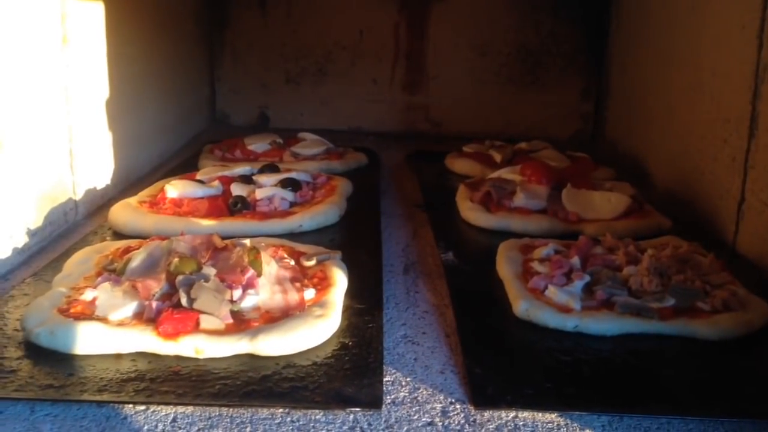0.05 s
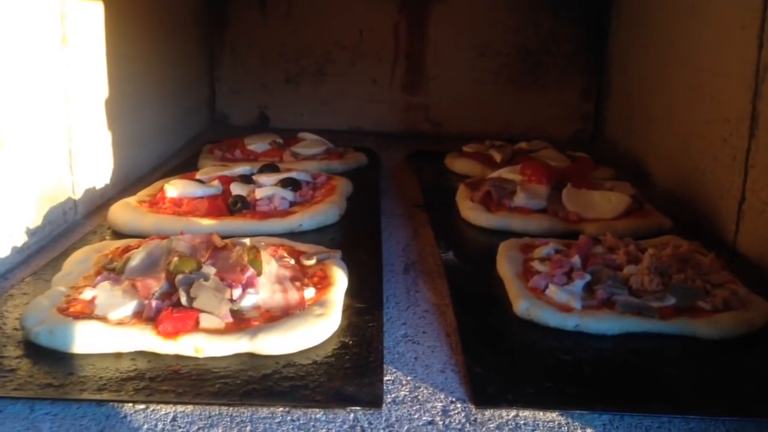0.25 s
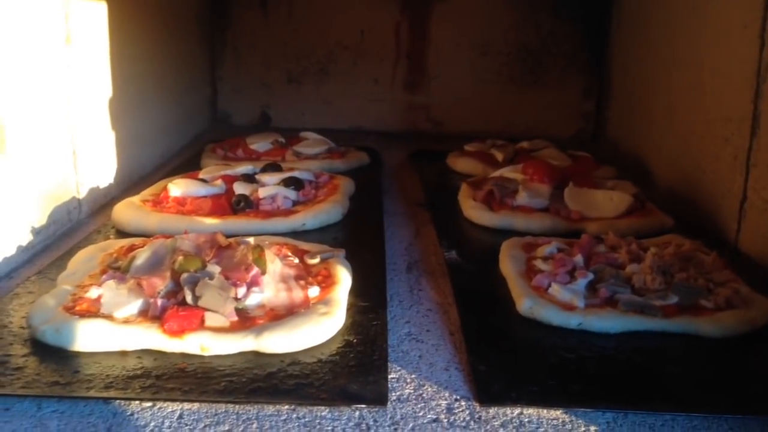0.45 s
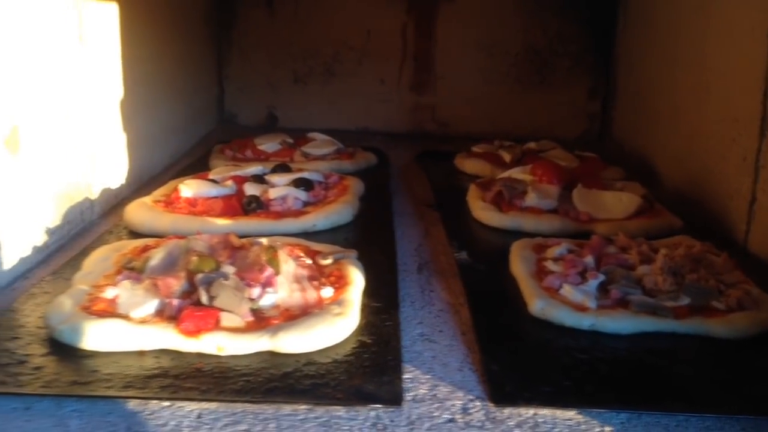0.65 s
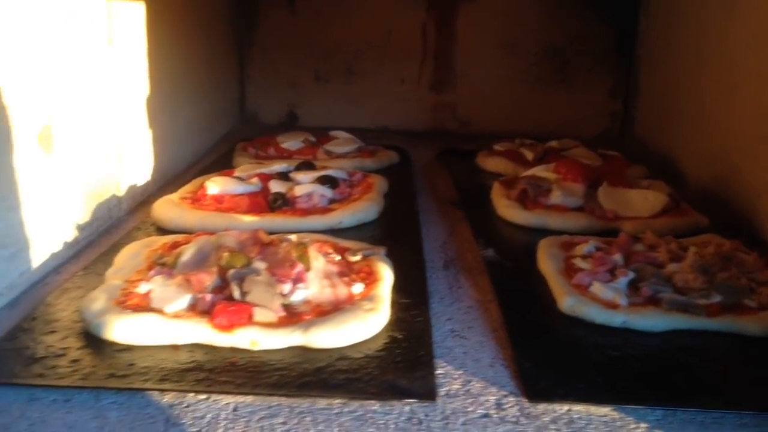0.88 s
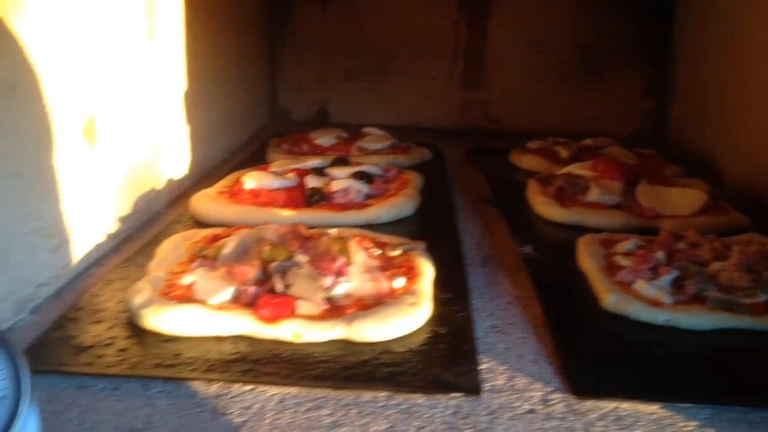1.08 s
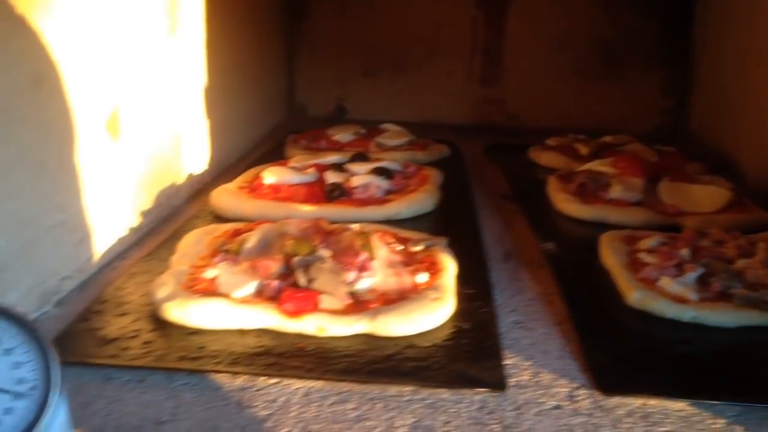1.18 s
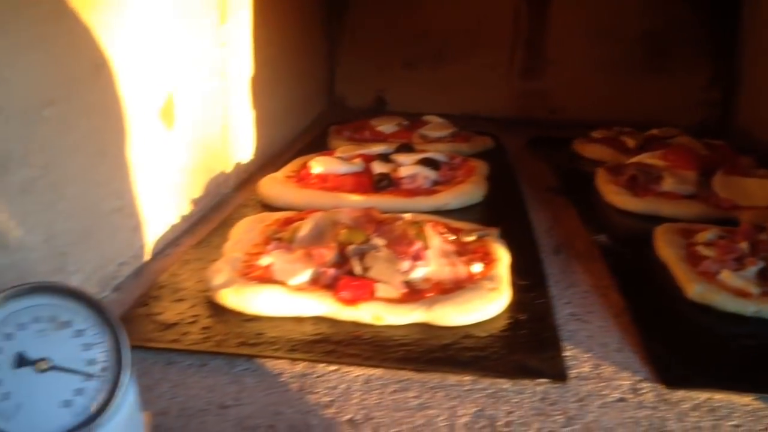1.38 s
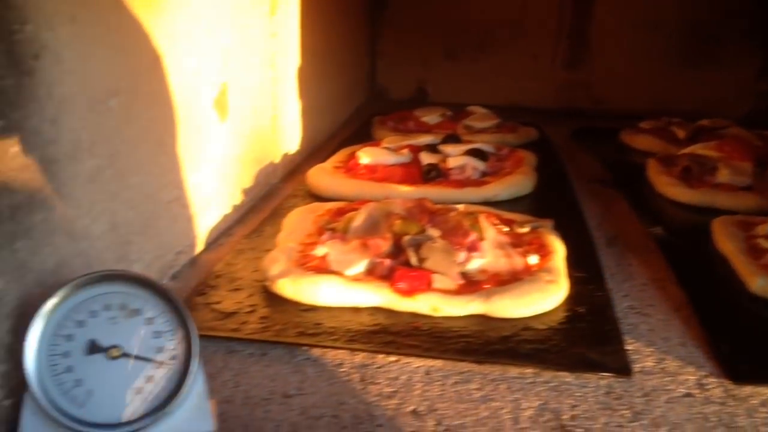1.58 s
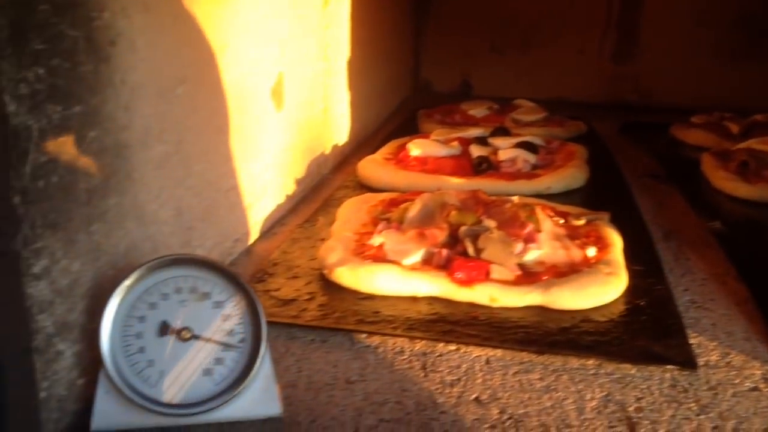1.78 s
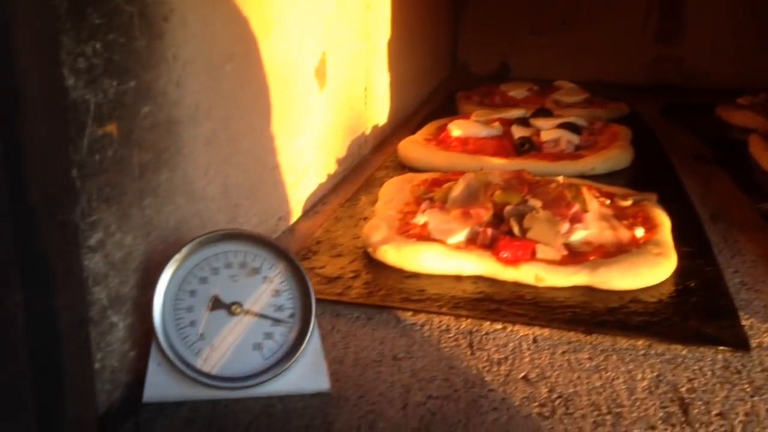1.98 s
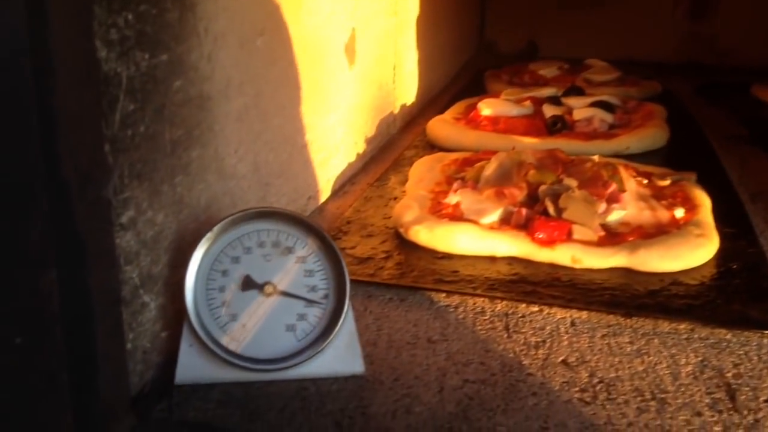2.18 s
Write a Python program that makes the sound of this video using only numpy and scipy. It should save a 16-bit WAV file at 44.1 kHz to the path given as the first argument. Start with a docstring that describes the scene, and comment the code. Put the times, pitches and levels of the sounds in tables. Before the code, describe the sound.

A wood fire crackles quietly in a masonry oven, heard from just outside its mouth. Sharp pops come at about 0.3 and 0.4 seconds, then around 0.9, 1.0 and 1.2, each ringing briefly in the chamber. Small ember ticks scatter throughout over a low, softly surging rumble, a wavering hum and light hiss. A very faint high whistle enters at about 2.2 seconds.

```python
"""Wood fire in an outdoor masonry oven.

Heard from just outside the mouth. Splitting wood pops and small embers tick; the chamber answers
each with a short ring. Faint sparks fall at random. Below lie the draught's rumble and soft surges,
fluttering flames, a wavering hum, even hiss and a thin whine. A faint whistle enters at the end."""
import sys
import numpy as np
from scipy import signal
from scipy.fft import rfft, irfft
from scipy.io import wavfile
from scipy.ndimage import uniform_filter1d

SR = 44100
rng = np.random.default_rng(int(sys.argv[2]) if len(sys.argv) > 2 else 0)


def bounce(signal):
    """Save signal as a 16-bit WAV file at the path given by the first command-line argument."""
    frames = np.transpose(np.atleast_2d(signal))
    limited = np.clip(frames, -1, 1)
    pcm = np.round(limited * 32767).astype(np.int16)
    wavfile.write(sys.argv[1], SR, pcm)


N = 99225

# Wood splits, and at 1.012 s a settling log gives a low knock. Each row: start in seconds, burst decay in
# seconds, resonances of the piece. # Each resonance: centre in Hz, width in Hz, level in dB before CRACKLE_EQ.
POPS = [(0.2765, 0.0017, [(280, 200, -51.5), (900, 1000, -46), (2270, 340, -33.5), (3570, 470, -43),
        (7080, 2400, -37), (10100, 3800, -38.5)]), (0.3903, 0.0012, [(308, 130, -39), (572, 71, -42.5),
        (1090, 500, -32.5), (1560, 820, -31), (2060, 270, -35), (3450, 1120, -37), (4880, 790, -39),
        (9650, 3400, -39)]), (0.877, .0011, [(1010, 900, -61), (2270, 320, -43.5), (3300, 1100, -48.5),
        (5580, 830, -50), (13000, 7700, -58.5)]), (0.9932, 0.0015, [(161, 70, -37), (360, 140, -43),
        (558, 118, -36), (2520, 2000, -48.5), (6360, 1700, -42.5), (10900, 5200, -51.5)]),
        (1.0119, 0.0024, [(137, 68, -40)]), (1.1807, .0012, [(550, 340, -57), (1350, 380, -47),
        (2610, 940, -40.5), (4080, 660, -48.5), (5730, 1800, -44.5)])]
# Ember ticks. Each row: start in seconds, click and ring levels in dB before CRACKLE_EQ, ring in Hz.
EMBER_TICKS = [(.1272, -52.5, -54, 4000), (0.1706, -55.5, -58.5, 2330), (.1782, -61, -70, 8900),
               (0.2922, -58, -58, 8500), (0.366, -62, -68, 8000), (.4670, -51.5, -53, 7200),
               (.5320, -60, -62, 4200), (0.549, -66, -60, 7440), (.5562, -47, -50.5, 11900),
               (.7190, -76, -65, 1800), (0.8232, -61, -62, 4200), (.9300, -62, -71, 7000),
               (1.0900, -58, -60, 6000), (1.1194, -60.5, -58, 11400), (1.2173, -59, -63, 6000),
               (1.3507, -53, -51, 6440), (1.4076, -76, -65, 7550), (1.4850, -51, -59, 3100),
               (1.524, -64, -58.5, 9150), (1.5430, -62, -66, 7500), (1.686, -67, -68, 7000),
               (1.8138, -64, -62, 2980), (1.9850, -57, -51, 6800), (2.1462, -61, -64.5, 7460)]
# Ring of the chamber. Each row: frequency in Hz, gain in dB, T60 in seconds.
OVEN_MODES = [(275, 4, 0.15), (573, -19, 0.098), (820, -2, 0.045), (1056, -4, 0.086), (1260, -4, 0.078),
              (1406, -5, .05), (1430, -12, .04), (1790, -26, 0.07), (2110, -1, 0.044), (3040, -4, .02),
              (3850, -11, .02), (6850, -7, 0.015)]
# Colour of all crackle. Each row: frequency in Hz, gain in dB.
CRACKLE_EQ = [(100, -3), (560, 0.5), (700, -3.5), (850, -1), (2400, -2), (2750, -7), (3200, -3.5),
              (4500, -3.5), (6500, -1), (8500, -2.5), (10200, -1.5), (12500, -1.5), (14000, 0),
              (16000, -11)]
# Draught rumble. Each row: frequency in Hz, relative density in dB.
RUMBLE_SPECTRUM = [(20, -30.5), (30, -21), (42, -9.5), (55, 0), (68, 1.5), (85, -2.5), (102, -3.5),
                   (122, -9.5), (140, -4.5), (170, -15), (215, -10), (300, -17), (350, -19), (450, -22.5),
                   (700, -29), (1100, -34.5), (2500, -45.5), (8000, -70)]
# Draught surges. Each row: peak time in seconds, sigma in seconds, centre in Hz, width in Hz, level in dB.
SURGES = [(.215, 0.041, 70.6, 49.5, -52.5), (0.367, 0.063, 69, 43.3, -48), (0.646, 0.11, 69.4, 48, -51.5),
          (0.85, 0.017, 285, 49.4, -53), (1.464, 0.027, 173, 93, -53.5), (1.523, 0.026, 61.6, 34.5, -47),
          (1.963, 0.026, 142, 50, -50), (1.968, .03, 255, 40.3, -53)]
# Hiss. Each row: frequency in Hz, relative density in dB.
HISS_SPECTRUM = [(500, 1), (2000, -2.5), (3000, -3.5), (3900, -0.5), (5200, -1.5), (6800, -3), (8200, -3),
                 (11000, -3), (15500, -5)]

TICK_DECAY_S, TICK_RISE_S = 0.00071, 0.0001
SCENE_TIME_S, EVENT_TIME_S = np.arange(N) / SR, np.arange(8192) / SR


def pops():
    """Wood splits, and one settling log: a burst of fractures rings the piece; each spot has its own
    reflections."""
    out = np.zeros(N)
    for start_s, decay_s, resonances in POPS:
        chamber = oven_response()
        for hz, width_hz, db in resonances:
            ring = steep_band(burst(decay_s, rise_s=0.00046), hz, width_hz, skirt=2.02)
            add(out, start_s, through_oven(ring, chamber, db))
    return out


def embers():
    """Embers tick: a broad click and a short ring, both answered by the chamber."""
    out = np.zeros(N)
    for start_s, click_db, ring_db, ring_hz in EMBER_TICKS:
        chamber = oven_response()
        click = band(burst(TICK_DECAY_S, TICK_RISE_S), hz=6050, width_hz=12000)
        ring = band(burst(TICK_DECAY_S, TICK_RISE_S), ring_hz, width_hz=0.27 * ring_hz)
        add(out, start_s, through_oven(click, chamber, click_db) + through_oven(ring, chamber, ring_db))
    return out


def sparks(rate_per_s=14, floor_db=-71, spread_db=2):
    """The faintest ticks, random in time, level and pitch."""
    out = np.zeros(N)
    for position, size, octaves in rng.random((int(rate_per_s * N / SR), 3)):
        tick = band(burst(TICK_DECAY_S, TICK_RISE_S), hz=5000 * 2 ** octaves, width_hz=3900)
        db = floor_db - spread_db * np.log(1 - 0.95 * size)
        add(out, position * N / SR, at_level(tick, db))
    return out


def oven_response():
    """Chamber impulse response: direct sound, quick reflections, a duller tail, ringing modes."""
    t = EVENT_TIME_S
    response = signal.unit_impulse(len(t))
    response += reflections(decay_s=0.0037, db=-5, cutoff_hz=6040)
    response += reflections(decay_s=0.015, db=-16.5, cutoff_hz=3240)
    for hz, db, t60_s in OVEN_MODES:
        decay_per_s = np.log(1000) / t60_s
        envelope = 2 * decay_per_s / SR * np.exp(-decay_per_s * t)
        response += undb(db) * envelope * np.cos(2 * np.pi * hz * t)
    return response


def reflections(decay_s, db, cutoff_hz):
    """Dense wall echoes, scaled to db, then low-passed."""
    echoes = burst(decay_s, rise_s=decay_s / 2)
    echoes *= undb(db) / np.sqrt(np.sum(echoes ** 2))
    return signal.lfilter(*signal.butter(2, cutoff_hz, fs=SR), echoes)


def through_oven(x, chamber, db):
    """A short sound with the chamber's answer, scaled to db."""
    return at_level(signal.fftconvolve(x, chamber)[:len(x)], db)


def draught_rumble():
    """The draught's steady low noise."""
    return undb(-52.5) * unit_rms(colour(noise(), RUMBLE_SPECTRUM))


def draught_surges():
    """The draught swells softly: low noise bands under Gaussian envelopes."""
    out = np.zeros(N)
    for peak_s, sigma_s, hz, width_hz, db in SURGES:
        swell = np.exp(-((SCENE_TIME_S - peak_s) / sigma_s) ** 2 / 2)
        air = swell * steep_band(noise(), hz, width_hz)
        out += undb(db) * air * np.sqrt(np.sum(swell ** 2) / np.sum(air ** 2))
    return out


def flames(swing_db=2):
    """Licking flames: a noise band that flutters in level."""
    air = steep_band(noise(), hz=490, width_hz=220)
    flutter = undb(swing_db * wander(rate_hz=21.9))
    return undb(-75.5) * unit_rms(air * flutter)


def hum():
    """A noise band narrow enough to sound like a wavering tone."""
    return undb(-58) * unit_rms(steep_band(noise(), hz=272.5, width_hz=31, skirt=1.6))


def hiss():
    """Faint, even broadband noise."""
    return undb(-62.5) * unit_rms(colour(noise(), HISS_SPECTRUM))


def whistle(start_s=2.197, rise_s=0.044, centre_hz=2150):
    """A faint, slightly unsteady tone fades in."""
    pitch_hz = centre_hz * (1 + 0.01 * wander(rate_hz=150))
    phase = 2 * np.pi * np.cumsum(pitch_hz) / SR
    fade = np.clip((SCENE_TIME_S - start_s) / rise_s, 0, 1)
    return undb(-67.5) * fade * unit_rms(np.sin(phase))


def whine(hz=15000):
    """A thin steady tone."""
    return undb(-89) * unit_rms(np.sin(2 * np.pi * hz * SCENE_TIME_S))


def burst(decay_s, rise_s):
    """A dying rush of tiny impulses with a near-flat spectrum."""
    envelope = np.exp(-EVENT_TIME_S / decay_s) * (1 - np.exp(-EVENT_TIME_S / rise_s))
    x = rng.standard_normal(len(envelope))
    for _ in range(6):  # impose envelope and flat spectrum in turn
        phase = np.angle(rfft(np.sign(x) * envelope))
        x = irfft(np.exp(1j * phase))
    limit = unit_rms(envelope)
    return np.clip(unit_rms(x) / 2, -limit, limit)


def band(x, hz, width_hz):
    """One resonance, gain 1 at its centre."""
    omega = 2 * np.pi * hz / SR
    alpha = width_hz / hz / 2 * np.sin(omega)
    return signal.lfilter([alpha, 0, -alpha], [1 + alpha, -2 * np.cos(omega), 1 - alpha], x)


def steep_band(x, hz, width_hz, skirt=2):
    """Two resonances in series, the second skirt times wider."""
    return band(band(x, hz, width_hz), hz, width_hz * skirt)


def colour(x, points):
    """Minimum-phase filter through (Hz, dB) points."""
    hz, db = np.array(points, float).T
    n = len(x)
    bins_hz = np.maximum(np.arange(n + 1) * SR / (2 * n), 1)
    gain = undb(np.interp(np.log(bins_hz), np.log(hz), db))
    cepstrum = irfft(np.log(gain))
    cepstrum[1:n] *= 2
    cepstrum[n + 1:] = 0
    return irfft(rfft(x, 2 * n) * np.exp(rfft(cepstrum)))[:n]


def wander(rate_hz):
    """Smooth random drift, rms 1."""
    hold = int(SR / rate_hz)
    steps = np.repeat(rng.standard_normal(N // hold + 1), hold)
    return unit_rms(uniform_filter1d(uniform_filter1d(steps, hold), hold)[:N])


def noise():
    return rng.standard_normal(N)


def undb(db):
    return 10 ** (db / 20)


def unit_rms(x):
    return x / np.sqrt(np.mean(x ** 2))


def at_level(x, db):
    """Scale a short sound to the energy of 10 ms at db."""
    return x * undb(db) * np.sqrt(SR / 100 / np.sum(x ** 2))


def add(out, start_s, x):
    i = int(start_s * SR)
    out[i:i + len(x)] += x[:N - i]


def scene():
    """Crackle over the background, the same in both channels."""
    bed = draught_rumble() + hum() + hiss() + whine() + draught_surges() + flames() + whistle()
    crackle = colour(pops() + embers() + sparks(), CRACKLE_EQ)
    mono = crackle + bed
    return np.array([mono, mono])


def record(dry):
    """Steep low-pass at 15.4 kHz."""
    return signal.sosfilt(signal.ellip(10, 0.2, 70, 15400, fs=SR, output="sos"), dry)


dry = scene()
out = record(dry)
bounce(out)
```